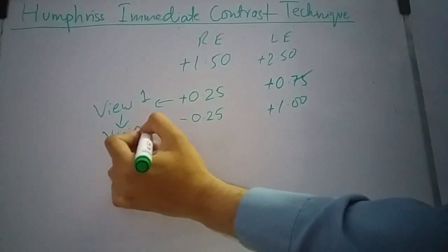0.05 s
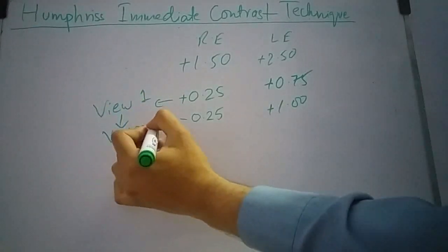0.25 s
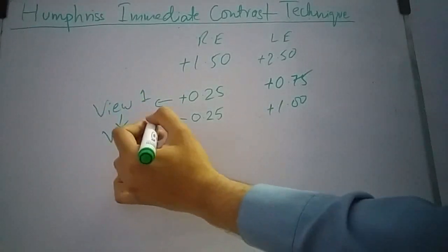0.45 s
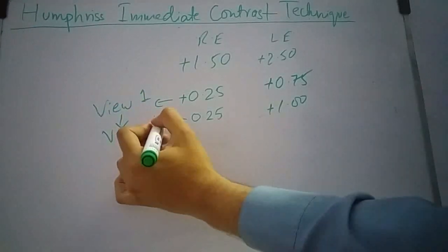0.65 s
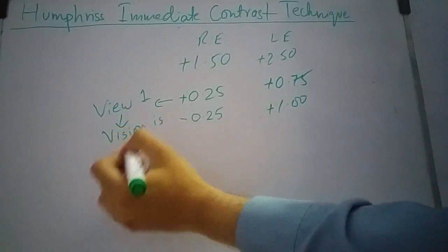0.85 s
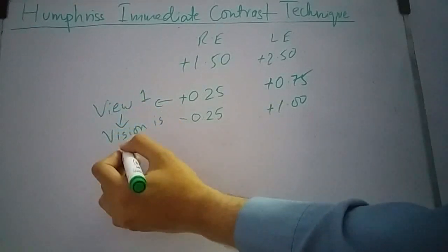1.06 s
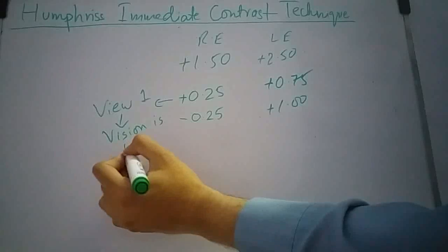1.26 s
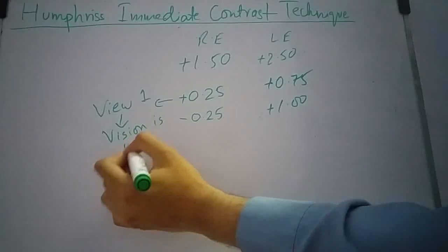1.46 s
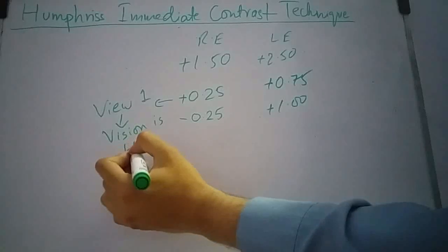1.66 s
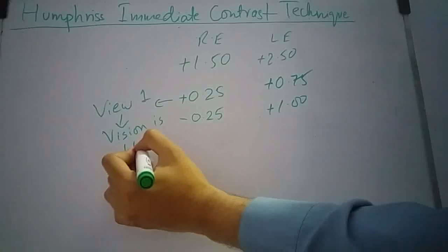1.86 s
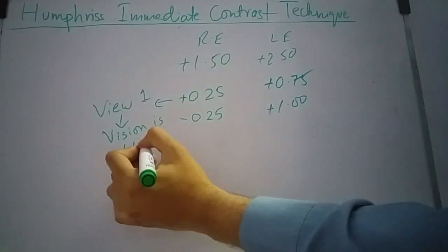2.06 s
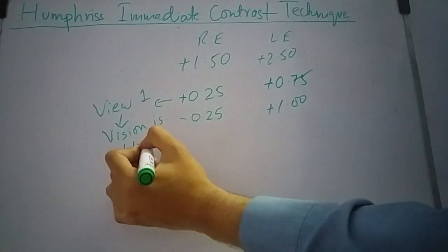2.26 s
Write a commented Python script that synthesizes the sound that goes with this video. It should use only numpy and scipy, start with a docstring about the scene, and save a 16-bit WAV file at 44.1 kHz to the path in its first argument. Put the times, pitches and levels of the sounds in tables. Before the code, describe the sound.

A felt marker writing on a whiteboard, with soft knocks and faintly squeaky strokes.

```python
"""A felt marker rubs and knocks on a wall-hung whiteboard, close by in a quiet room.
Stick-slip friction gives each stroke a thin, half-squeaking hiss, and once the tip ticks sharply.
Each landing is an impact that thumps the panel and sets its low modes ringing; between landings
the board rumbles under the moving hand. Beneath it all lie a steady room hum and the
microphone's hiss and faint electronic whine."""
import sys
import numpy as np
from scipy import signal
from scipy.fft import rfft, irfft
from scipy.io import wavfile

SR = 44100
rng = np.random.default_rng(int(sys.argv[2]) if len(sys.argv) > 2 else 0)


def unload_wav(signal):
    """Save mono or channel-first audio to the path in sys.argv[1] as 16-bit WAV at rate SR, clipped to [-1, 1]."""
    wavfile.write(
        sys.argv[1],
        SR,
        np.round(np.clip(np.atleast_2d(signal).T, -1, 1) * 32767).astype(np.int16),
    )


N = 101429
ANTIPHASE = np.array([[1], [-1]])


def undb(db):
    """The decibel scale: 20 dB is a factor of ten in amplitude."""
    return 10 ** (np.asarray(db) / 20)


def unit(x):
    """Normalisation to an rms of 1."""
    return x / np.sqrt(np.mean(x ** 2))


def pan(db):
    """Interaural level difference: two gains, the left exceeding the right by db."""
    return undb(np.array([[db], [-db]]) / 2)


def fade(age, t60):
    """Exponential damping: a fall of 60 dB in t60 seconds."""
    return np.exp(-np.log(1000) * age / t60)


def lowpass(x, hz, order=2):
    """Butterworth low-pass filtering with its cut-off at hz."""
    return signal.sosfilt(signal.butter(order, hz, fs=SR, output="sos"), x + 1e-18)


def colour(x, spectrum):
    """Minimum-phase filtering to a (Hz, dB) outline; folding the cepstrum makes it causal."""
    size = 2 ** 17
    hz, db = np.array(spectrum).T
    freqs = np.maximum(np.fft.rfftfreq(size, 1 / SR), 1)
    gain = undb(np.interp(np.log(freqs), np.log(hz), db))
    cepstrum = irfft(np.log(gain))
    cepstrum[1:size // 2] *= 2
    cepstrum[size // 2 + 1:] = 0
    return irfft(rfft(x, size) * np.exp(rfft(cepstrum)))[..., :N]


def coloured_noise(spectrum, shape=N):
    """Spectral shaping of white noise, scaled to an rms of 1."""
    return unit(colour(rng.standard_normal(shape), spectrum))


def narrowband(hz, width_hz, channels=2):
    """Quadrature modulation: a resonant band of noise whose centre may move."""
    in_phase, quadrature = lowpass(rng.standard_normal((2, channels, N)), width_hz / 2)
    phase = 2 * np.pi * np.cumsum(hz * np.ones(N)) / SR
    return unit(in_phase * np.cos(phase) + quadrature * np.sin(phase))


# Spectra of the hiss and of its hump near 7 kHz. Each row: frequency in Hz, relative level in dB.
HISS_SPECTRUM = [(1000, 5), (3000, -1.5), (5000, 0.5), (8500, -1), (10000, -7.5), (10900, -3.5),
                 (12500, -7), (15500, -10)]
HUMP_SPECTRUM = [(4000, -35), (6200, -10.5), (6900, -0.5), (7450, 2), (8100, -6), (9000, -11), (10500, -29)]
# Slow drift of the hiss. Each row: time in seconds, level in dB.
HISS_ENVELOPE = [(0, -66), (.3, -65), (.62, -66), (.85, -69), (1.5, -69), (2.3, -67.5)]
# Tones of the electronic whine. Each row: frequency in Hz, level in dB.
WHINE_TONES = [(6950, -76.5), (9265, -85), (11827, -95)]
HUMP_DB, HUMP_PAN_DB = -1.5, 16.5
FLUTTER_HZ, FLUTTER_PER_S, FLUTTER_DB = 10800, 31, -78.5


def microphone_hiss(t):
    """Electronic self-noise: hiss with a hump on the left, a thin whine and a faint high flutter."""
    hiss = coloured_noise(HISS_SPECTRUM, (2, N))
    hump = pan(HUMP_PAN_DB) * undb(HUMP_DB) * coloured_noise(HUMP_SPECTRUM, (2, N))
    level = undb(np.interp(t, *np.array(HISS_ENVELOPE).T))
    whine = sum(undb(db) * np.sin(2 * np.pi * hz * t) for hz, db in WHINE_TONES)
    pulsing = np.maximum(np.sin(2 * np.pi * FLUTTER_PER_S * t), 0) ** 2
    flutter = unit(narrowband(FLUTTER_HZ, width_hz=620) * pulsing)
    return (hiss + hump) * level + whine + undb(FLUTTER_DB) * flutter


# Spectra of the room's in-phase and antiphase parts. Each row: frequency in Hz, relative level in dB.
ROOM_MID_SPECTRUM = [(20, -41), (42, -23), (62, -9), (85, -11), (110, -4), (145, -15.5), (185, -4),
                     (230, -9), (270, -7), (325, -8.5), (362, 2), (400, -4), (450, -15.5), (520, -17.5),
                     (650, -8), (780, -6.5), (900, -14), (1300, -21.5), (2500, -28), (5000, -42)]
ROOM_SIDE_SPECTRUM = [(20, -55), (70, -12), (200, -5.5), (370, 0), (520, -5), (750, 0.5), (1100, -7),
                      (2000, -13.5), (5000, -22.5)]
ROOM_MID_DB, ROOM_SIDE_DB, ROOM_WAVER_DB = -60, -64.5, 2.3


def room_hum():
    """Interaural coherence: the slightly wavering hum is most alike at both ears in the bass."""
    waver = undb(ROOM_WAVER_DB * unit(lowpass(rng.standard_normal(N), hz=2.4)))
    mid = undb(ROOM_MID_DB) * coloured_noise(ROOM_MID_SPECTRUM)
    side = undb(ROOM_SIDE_DB) * coloured_noise(ROOM_SIDE_SPECTRUM)
    return waver * mid + ANTIPHASE * side


# Spectrum of the board's rumble. Each row: frequency in Hz, relative level in dB.
RUMBLE_SPECTRUM = [(25, -36), (45, -17.5), (62, 10.5), (80, -3.5), (115, -5.5), (150, -13.5), (185, -1.5),
                   (230, -20.5), (275, -2), (330, -3.5), (375, 5), (420, 1.5), (500, -12.5), (700, -17.5),
                   (1200, -32)]
# Course of the rumble as the hand moves. Each row: time in seconds, level in dB.
RUMBLE_ENVELOPE = [(0, -61), (.14, -56), (.3, -60), (.72, -61.5), (.82, -64.5), (.92, -71.5), (1.0, -59.5),
                   (1.36, -60.5), (1.47, -67.5), (1.62, -64.5), (1.85, -60), (2.3, -59)]
# Dull scuffs of the tip. Each row: centre in seconds, half length in seconds, peak level in dB.
TIP_SCUFFS = [(0.023, 0.084, -59), (1.357, 0.045, -69), (1.627, 0.064, -76), (2.016, 0.064, -76)]


def board_rumble(t):
    """Forced vibration: the board rumbles under the hand and scuffs dully where the tip drags."""
    level = undb(np.interp(t, *np.array(RUMBLE_ENVELOPE).T))
    rumble = level * coloured_noise(RUMBLE_SPECTRUM)
    drag = sum(undb(db) * np.exp(-((t - centre) / half) ** 2) for centre, half, db in TIP_SCUFFS)
    return rumble + drag * narrowband(hz=798, width_hz=320)


# Contacts within the one tick. Each row: start in seconds, relative level in dB.
TICK_CONTACTS = [(1.632, -8.5), (1.6314, 3), (1.6327, 3.5), (1.6338, -4)]
# Spectrum of the tick's crack. Each row: frequency in Hz, relative level in dB.
CRACK_SPECTRUM = [(500, -16), (1500, -29), (3600, -18), (5200, -2), (8200, -8), (11500, -6.5), (15500, -12)]
# Modes of the tip. Each row: frequency in Hz, relative level in dB, 60 dB decay time in seconds.
TIP_RESONANCES = [(2886, -22, 0.046), (4540, -11, 0.021), (5350, 1.5, 0.0061), (5930, -9, .008),
                  (7150, -17, 0.0058), (11800, -19, .004)]
CRACK_DB, CRACK_DECAY_S, TIP_RING_DB = -42, .0009, -38.5
TICK_ROOM_DB, TICK_ROOM_DECAY_S = -14.5, 0.021


def tip_tick(t):
    """Impact and rebound: the tip snaps on the board with a crack, a short room tail and a brief ring."""
    envelope = ring = 0
    for start, db in TICK_CONTACTS:
        age = np.maximum(t - start, 0)
        strength = undb(db) * (t >= start)
        room_tail = undb(TICK_ROOM_DB) * np.exp(-age / TICK_ROOM_DECAY_S)
        envelope += strength * (np.exp(-age / CRACK_DECAY_S) + room_tail)
        for hz, mode_db, t60 in TIP_RESONANCES:
            phase = 2 * np.pi * (hz * age + rng.random((2, 1)))
            ring += strength * undb(mode_db) * fade(age, t60) * np.sin(phase)
    crack = colour(envelope * rng.standard_normal((2, N)), CRACK_SPECTRUM)
    return pan(db=0.87) * (undb(CRACK_DB) * crack + undb(TIP_RING_DB) * ring)


WALL_DELAY_MS, WALL_GAIN = 2.8, 0.58


def with_wall_reflection(direct):
    """Comb filtering: one close reflection interferes with the direct sound."""
    samples = np.arange(N)
    delay = WALL_DELAY_MS * SR / 1000
    reflected = np.array([np.interp(samples - delay, samples, channel) for channel in direct])
    return direct + WALL_GAIN * reflected


# Strokes of the tip. Each row: start in seconds, length in seconds, relative rub level in dB,
# squeak frequency in Hz, relative squeak level in dB, relative scratch level in dB.
MARKER_STROKES = [(-.02, 0.1, -2.5, 5440, -4, -3), (0.19, 0.08, -4.5, 5380, 2, -4),
                  (0.386, 0.045, -2.5, 5270, -2.5, -3), (.59, 0.067, -4.5, 5410, -3, -3),
                  (.67, 0.046, -2, 5690, 1, -2), (.735, .045, -2, 5380, 8.5, 4),
                  (1.091, 0.061, -4, 5340, -14, -5), (1.144, .065, -1, 5560, -6, -5),
                  (1.23, .105, -2, 5400, -2, 5.5), (1.329, 0.075, 0, 5540, 6, 7),
                  (1.521, 0.059, -3.5, 5350, -14, 2), (1.582, 0.061, 2.5, 5400, 8, 4),
                  (1.753, 0.0473, -2, 5230, -22, 2), (1.797, .05, -1, 5310, -2, 4),
                  (1.855, 0.11, -6.5, 5066, -6.5, -4.5), (1.982, 0.066, -2, 5050, 3, 2),
                  (2.05, 0.11, -2, 4980, -2, 2), (2.25, 0.054, -16, 5400, -1, -14)]
# Spectra of the felt's rub and its fibres' scratch. Each row: frequency in Hz, relative level in dB.
RUB_SPECTRUM = [(500, -14), (1200, -1.5), (2000, -2), (2800, 0.5), (3500, -1.5), (4800, 5), (6000, 5.5),
                (7300, 1.5), (8800, -2.5), (10000, 9), (11200, -3), (13000, -24), (15500, -23.5)]
SCRATCH_SPECTRUM = [(4000, -44), (8800, -6), (10000, 15), (11200, -5), (13000, 0), (14200, -32),
                    (15500, -16)]
RUB_DB, SCRATCH_DB, SQUEAK_DB = -60, -70, -67.5
STROKE_ATTACK_S, STROKE_RELEASE_S = .02, .018
SLIPS_PER_S, SLIP_SPREAD_DB = 5000, 4
SQUEAK_WIDTH_HZ, SQUEAK_GLIDE = 490, 0.039  # the glide is a fraction of the pitch per stroke


def marker_strokes(t):
    """Stick-slip friction: the felt moves in tiny jerks; a tip resonance rises a little in each stroke."""
    rub, squeak, scratch, total_press, weighted_hz = np.zeros((5, N))
    for start, length, rub_db, hz, squeak_db, scratch_db in MARKER_STROKES:
        attack = np.clip((t - start) / STROKE_ATTACK_S, 0, 1)
        release = np.clip((start + length - t) / STROKE_RELEASE_S + .5, 0, 1)
        press = attack * release
        rub += undb(rub_db) * press
        squeak += undb(squeak_db) * press
        scratch += undb(scratch_db) * press
        total_press += press
        weighted_hz += press * hz * (1 + SQUEAK_GLIDE * ((t - start) / length - .5))
    slipping = rng.random((2, N)) < SLIPS_PER_S / SR
    slips = slipping * rng.standard_normal((2, N)) * undb(SLIP_SPREAD_DB * rng.standard_normal(N))
    squeak_hz = weighted_hz / (total_press + 1e-9)  # overlapping strokes share one mean pitch
    rubbing = undb(RUB_DB) * rub * unit(colour(slips, RUB_SPECTRUM))
    scratching = undb(SCRATCH_DB) * scratch * unit(colour(slips, SCRATCH_SPECTRUM))
    squeaking = undb(SQUEAK_DB) * squeak * narrowband(squeak_hz, SQUEAK_WIDTH_HZ)
    return pan(db=-2) * (rubbing + scratching + squeaking)


# Modes of the panel. Each row: frequency in Hz, relative level in dB, 60 dB decay time in seconds.
PANEL_MODES = [(80.4, -9, 0.23), (101, -23, 0.24), (147.9, -4, 0.41), (242.6, -1, 0.404), (300.3, -16, 1),
               (362, 9, 0.11), (383.7, 5, 0.32), (439, -9, 0.64), (479, -7, 0.5), (556, 5, 0.17),
               (596, -7, 0.46), (620, -21, 0.12), (708, -6.5, 0.52), (825, -15, 0.34)]
RING_DB, RING_RISE_S = -44, 0.021


def panel_ring(age):
    """Modal superposition: the struck panel rings as a sum of damped sinusoids."""
    modes = sum(undb(db) * np.sin(2 * np.pi * hz * age) * fade(age, t60) for hz, db, t60 in PANEL_MODES)
    rise = 1 - np.exp(-age / RING_RISE_S)
    return pan(db=-2.5) * undb(RING_DB) * rise * modes


BOOM_WIDTH_HZ, BOOM_DB, BOOM_PEAK_S = 53, -47, 0.015


def panel_boom(age, hz):
    """Narrowband resonance: a low boom swells just after the blow and dies away."""
    swell = age / BOOM_PEAK_S * np.exp(1 - age / BOOM_PEAK_S)
    return undb(BOOM_DB) * swell * narrowband(hz, BOOM_WIDTH_HZ, channels=1)


# Spectra of the thump and of its antiphase part. Each row: frequency in Hz, relative level in dB.
THUMP_SPECTRUM = [(30, -47), (80, -26), (150, -7.5), (250, -17.5), (400, -8.5), (500, -6), (620, 2),
                  (730, -16.5), (880, -11), (1000, -33.5), (1500, -22.5), (3000, -20)]
THUMP_SIDE_SPECTRUM = [(100, -39), (380, -34), (500, -22), (590, 0), (680, -9), (850, -15), (1000, -30)]
# Returns from frame and wall. Each row: delay in milliseconds, left gain in dB, right gain in dB.
EARLY_REFLECTIONS = [(2.8, 0, 0.5), (6.91, -.5, 1.5), (10.72, -7, -6), (17.8, -8, -6.5),
                     (18.52, -4.5, -1.5), (22.69, -17, -14.5)]
THUMP_DB, THUMP_SIDE_DB, SIDE_LAG_MS = 15, 17, 3.61


def panel_thump(t, start):
    """Impulse response: the panel colours a blow and its early reflections into a thump."""
    def impulse(delay_ms):
        return np.sinc((t - start - delay_ms / 1000) * SR)

    reflections = sum(undb([[left], [right]]) * impulse(ms) for ms, left, right in EARLY_REFLECTIONS)
    thump = undb(THUMP_DB) * colour(impulse(0) + reflections, THUMP_SPECTRUM)
    side = undb(THUMP_SIDE_DB) * colour(impulse(SIDE_LAG_MS), THUMP_SIDE_SPECTRUM)
    return ANTIPHASE * side - thump


# Landings of the tip. Each row: start in seconds, relative level in dB, softness cut-off in Hz,
# ring gain in dB, boom gain in dB, boom frequency in Hz.
LANDINGS = [(.2040, 2, 845, -4.5, -6, 116.5), (0.4018, -.5, 1014, 0.5, -1.5, 110),
            (0.583, -1, 886, 2, 1.5, 100), (1.0885, -7.5, 550, -6.5, 7.5, 160),
            (1.5357, -10, 580, 1.5, 6, 81), (1.7575, -7.5, 546, 3.5, 7.5, 124.5),
            (1.968, -29.5, 460, 5, 14.5, 92)]
# Spectra of the diffuse tail and the crushed felt. Each row: frequency in Hz, relative level in dB.
TAIL_SPECTRUM = [(40, -41), (100, -9), (200, -4), (400, 17.5), (600, -5.5), (850, 6), (1050, -39),
                 (2000, -39), (4000, -55)]
CRUSH_SPECTRUM = [(500, 7), (1200, 4.5), (1800, 0), (2500, -3.5), (4000, -17), (5400, -14), (6500, -2),
                  (9000, -7), (15000, -26)]
TAIL_DB, TAIL_T60_S, TAIL_RISE_S, TAIL_SIDE_GAIN = -36.5, 0.25, 0.006, 0.21
CRUSH_DB, CRUSH_T60_S, CRUSH_SHARE = -59.5, 0.42, 0.18  # the crush follows a share of the landing's dB


def marker_landings(t):
    """Soft impact: the felt crushes with a brief hiss and cushions the blow, low-passing the panel."""
    out = np.zeros((2, N))
    mid, side = coloured_noise(TAIL_SPECTRUM, (2, N))
    diffuse = undb(TAIL_DB) * (mid + TAIL_SIDE_GAIN * ANTIPHASE * side)
    felt = coloured_noise(CRUSH_SPECTRUM, (2, N))
    for start, db, cutoff_hz, ring_db, boom_db, boom_hz in LANDINGS:
        age = np.maximum(t - start, 0)
        ring = undb(ring_db) * panel_ring(age)
        boom = undb(boom_db) * panel_boom(age, boom_hz)
        tail = diffuse * fade(age, TAIL_T60_S) * (1 - np.exp(-age / TAIL_RISE_S))
        knock = lowpass(panel_thump(t, start) + ring + boom + tail, cutoff_hz, order=5)
        crush = felt * (t >= start) * fade(age, CRUSH_T60_S)
        out += undb(db) * knock + undb(CRUSH_DB + CRUSH_SHARE * db) * crush
    return out


def scene():
    """Linear superposition: marker, board, room and hiss add as sound pressures."""
    t = np.arange(N) / SR
    marker = marker_landings(t) + with_wall_reflection(marker_strokes(t)) + tip_tick(t)
    return marker + board_rumble(t) + room_hum() + microphone_hiss(t)


TOP_HZ = 15800


def record(dry):
    """Band limiting: a steep elliptic low-pass removes the highest treble."""
    return signal.sosfilt(signal.ellip(10, .2, 70, TOP_HZ, fs=SR, output="sos"), dry)


dry = scene()
out = record(dry)
unload_wav(out)
```